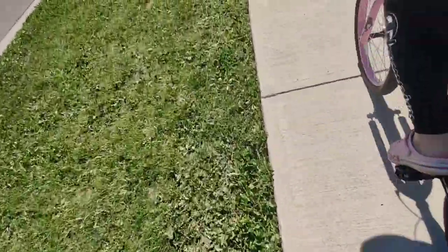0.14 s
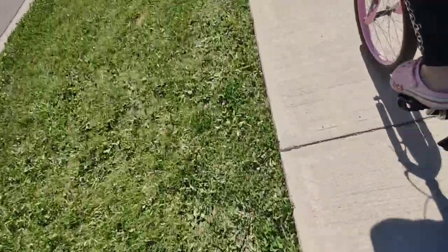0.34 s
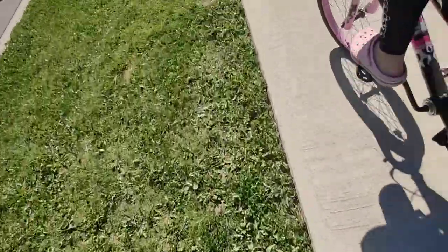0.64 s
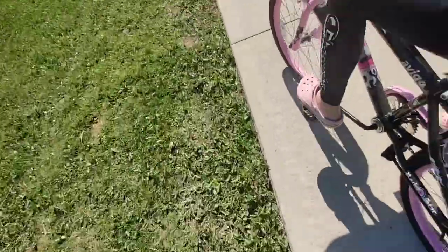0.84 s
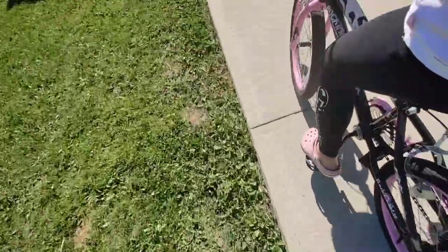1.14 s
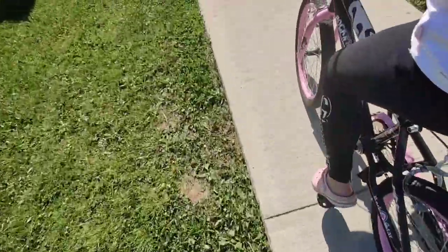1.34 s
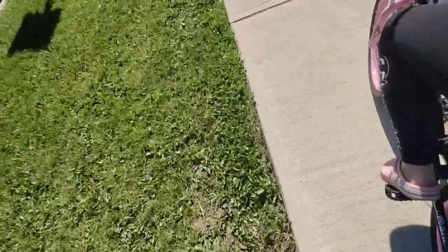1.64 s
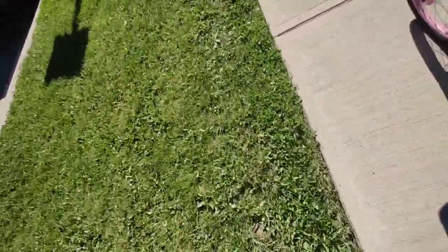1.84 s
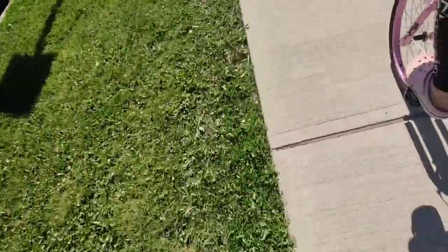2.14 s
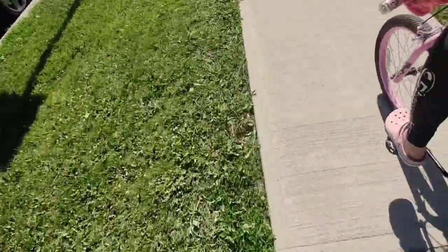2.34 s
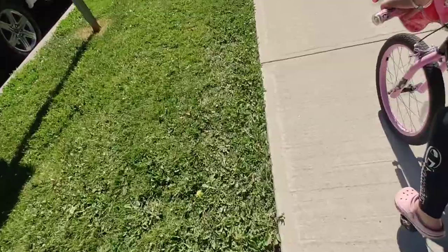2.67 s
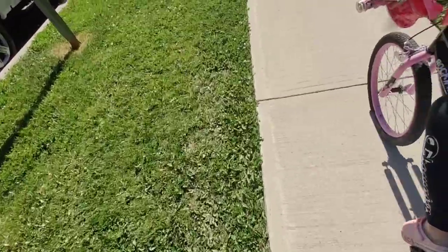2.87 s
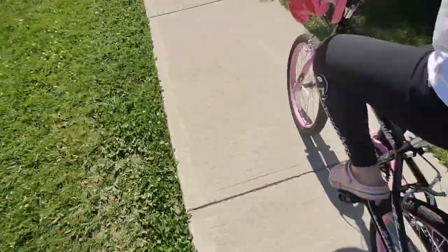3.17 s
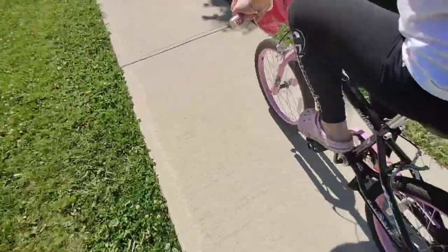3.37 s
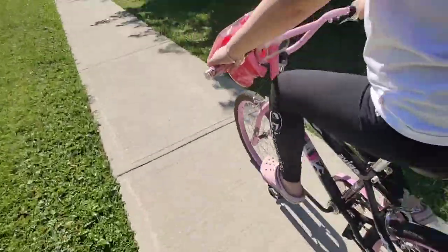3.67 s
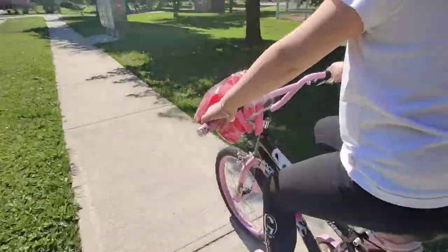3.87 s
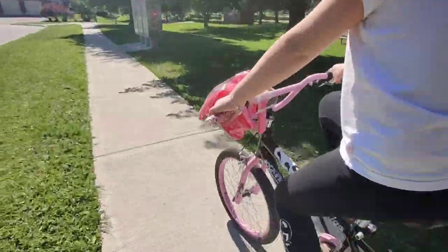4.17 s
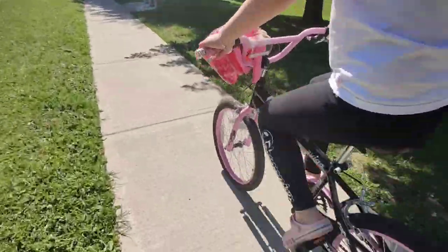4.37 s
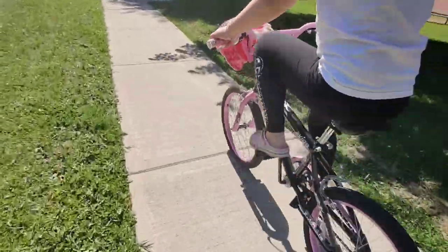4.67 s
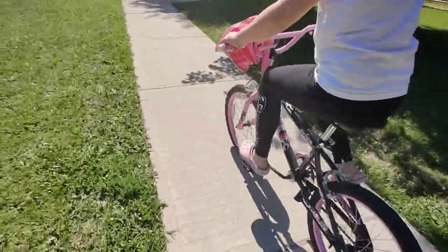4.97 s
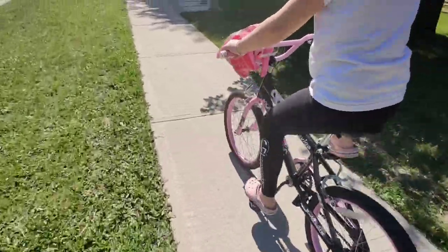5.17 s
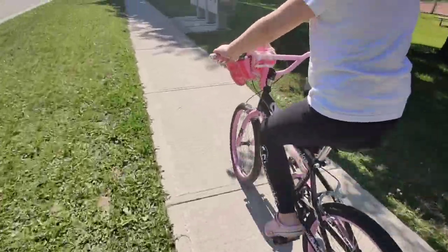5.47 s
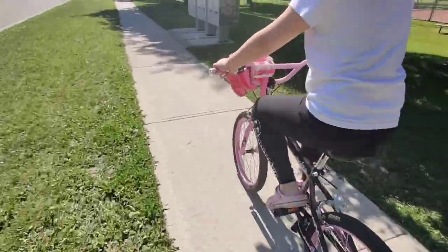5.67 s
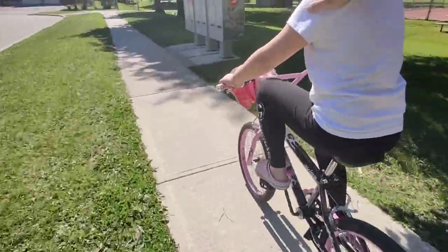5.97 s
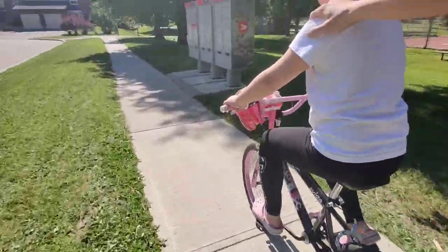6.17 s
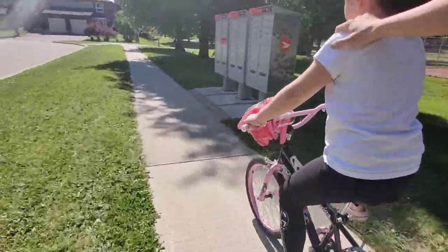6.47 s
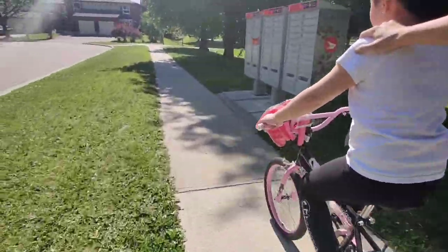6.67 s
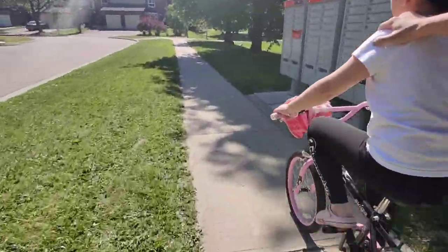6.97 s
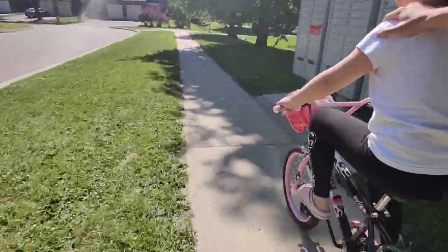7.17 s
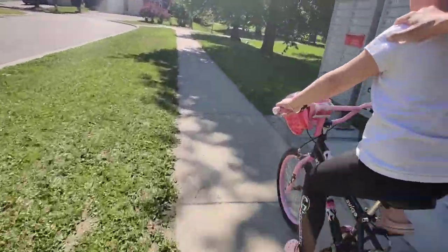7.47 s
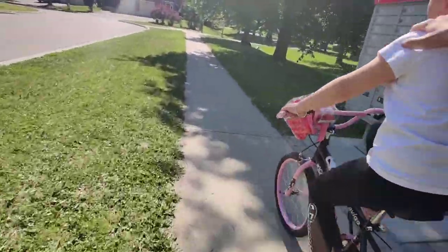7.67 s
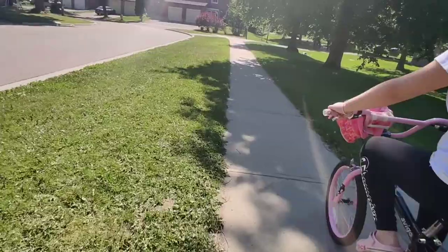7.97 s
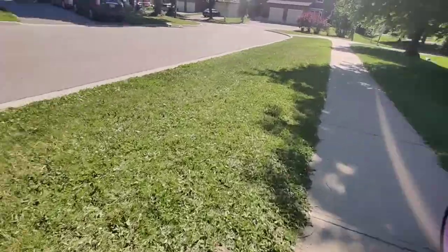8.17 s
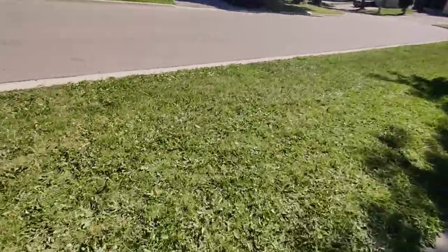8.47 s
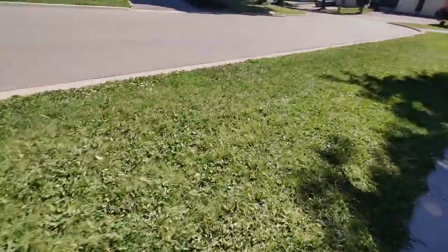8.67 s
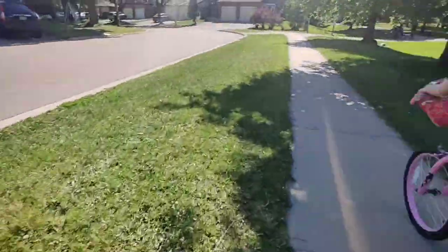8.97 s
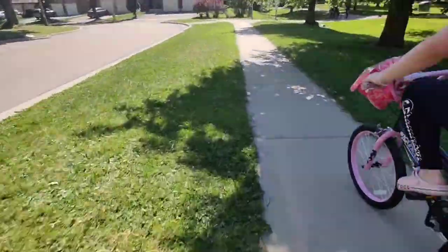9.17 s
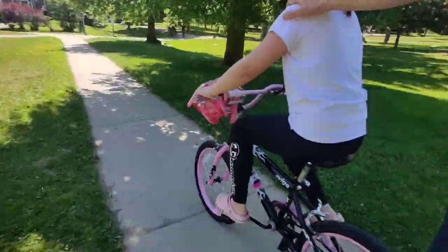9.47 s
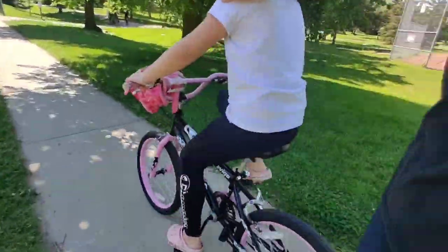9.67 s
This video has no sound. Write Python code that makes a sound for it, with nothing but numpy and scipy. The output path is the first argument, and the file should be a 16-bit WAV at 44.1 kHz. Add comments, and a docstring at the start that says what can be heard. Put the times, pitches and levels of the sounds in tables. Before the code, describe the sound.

A skateboard rolls on a rough concrete sidewalk in an open park, heard close from a moving handheld microphone. A low grainy rumble runs throughout, broken by irregular paired knocks and clacks as wheels cross joints, with gritty crunch and loose metal rattle. Lumpy wind booms and flutters unevenly left and right. The hardest clacks come just after the middle; a strong gust rises near the end. Almost no echo.

```python
"""Clacks ring out over a low rumble as a skateboard rolls on rough concrete, while wind buffets two microphone ports.
It runs beside a child's bicycle, heard from the rider's hand. Clacks layer a knock, ringing deck modes, a slap
and noise crunch; rolling is dense random impacts, filtered; grit ticks, sand, stones and scuffs are short noise.
Wind is lumpy filtered noise on each port. Clacks and sand leave only a short, faint tail.
Table levels are relative: trims in the functions set the final mix."""
import sys
import numpy as np
from scipy import signal
from scipy.fft import rfft, irfft
from scipy.io import wavfile
from scipy.ndimage import uniform_filter1d, minimum_filter1d, map_coordinates

SR = 44100
rng = np.random.default_rng(int(sys.argv[2]) if len(sys.argv) > 2 else 0)


def generate_wav(signal):
    """Clip the signal to [-1, 1] and save it as 16-bit WAV at the path in sys.argv[1]."""
    frames = np.transpose(np.atleast_2d(signal))
    scaled = np.clip(frames, -1, 1) * 32767
    pcm = np.round(scaled).astype(np.int16)
    wavfile.write(sys.argv[1], SR, pcm)


N = 433503
TIME = np.arange(N) / SR


def from_db(db):
    """Decibels to amplitude gain."""
    return np.exp(np.asarray(db) * (np.log(10) / 20))


def rms_one(x):
    """Scale to unit rms."""
    return x / np.sqrt(np.mean(x ** 2) + 1e-20)


def in_time(rows):
    """Draw the columns of an automation table sample by sample, with straight lines between points."""
    s, *columns = np.transpose(rows)
    return [np.interp(TIME, s, column) for column in columns]


def panned(x, balance_db):
    """Share a sound between left and right at constant power; positive balance leans left."""
    gains = from_db(np.array([[.5], [-.5]]) * balance_db)
    return x * gains / np.sqrt(np.mean(gains ** 2, axis=0))


def colour(x, spectrum, size=4096):
    """Causal minimum-phase filter: folding the cepstrum packs the energy at the onset."""
    hz, level_db = np.transpose(spectrum)
    bins = np.maximum(np.arange(size // 2 + 1) * SR / size, 1)
    gain = from_db(np.interp(np.log(bins), np.log(hz), level_db))
    cepstrum = irfft(np.log(gain))
    cepstrum[1:size // 2] *= 2
    cepstrum[size // 2 + 1:] = 0
    response = irfft(np.exp(rfft(cepstrum)))
    return signal.oaconvolve(x, response)[:len(x)]


def drift(rate_hz):
    """Slow random motion of rms 1: noise through two equal low-pass poles, run on every 40th sample."""
    r = np.exp(-2 * np.pi * rate_hz * 40 / SR)
    white = rng.standard_normal(N // 40 + 2002)
    slow = signal.lfilter([1], [1, -2 * r, r * r], white)[2000:]  # skip the settling
    return np.interp(np.arange(N) / 40, np.arange(len(slow)), rms_one(slow))


def noise(spectrum):
    """Coloured noise of rms 1."""
    return rms_one(colour(rng.standard_normal(N), spectrum))


def grains(per_s, spread_db):
    """Tiny impacts of uneven size at random moments."""
    out = np.zeros(N)
    born = np.flatnonzero(rng.random(N) < per_s / SR)
    spread = np.minimum(rng.standard_exponential(len(born)), 4)
    out[born] = from_db(spread_db * spread) * rng.standard_normal(len(born))
    return out


def impacts(per_s, spread_db, spectrum):
    """Coloured stream of tiny impacts, rms 1."""
    return rms_one(colour(grains(per_s, spread_db), spectrum))


def burst(t, t60, uneven_db=0):
    """A dying spray of micro-contacts with unit energy; when uneven, a few of them dominate."""
    size_db = uneven_db * rng.standard_normal(len(t)) - 60 * t / t60
    spray = rng.standard_normal(len(t)) * from_db(size_db)
    return spray / np.linalg.norm(spray)


def damped(t, hz, t60):
    """A struck mode: a sine with exponential decay."""
    return np.sin(2 * np.pi * hz * t) * from_db(-60 * t / t60)


def blow(x, level_db):
    """Set a short sound's energy to that of a hundredth of a second at the given rms level."""
    return from_db(level_db) * x * np.sqrt(SR / 100) / np.linalg.norm(x)


def add(out, s, x):
    """Mix x into out from time s, trimming whatever falls outside."""
    start = int(round(s * SR))
    skip = max(-start, 0)
    part = x[skip:N - start]
    out[start + skip:start + skip + len(part)] += part


# Place of the board between the ports: t/s, left lag/samples, left minus right/dB
PLACE = [(0, 8.2, -2.5), (2.7, 7.5, 0), (3.8, 7.2, -4), (4.4, 5.4, -3), (5.3, 6.1, -3.5), (6.7, 6.3, -4),
         (7.4, 5.1, -5), (8.1, 4.6, -1.5), (8.6, 5.7, -3.5), (8.8, 5.8, -4), (9.3, 6.9, -7), (9.83, 1, 0.5)]


def at_ports(x):
    """The board's sound reaches the right port first; moving lags and level differences place it."""
    lag, balance_db = in_time(PLACE)
    n = np.arange(N)
    left = map_coordinates(x, [n - lag / 2], order=3)
    right = map_coordinates(x, [n + lag / 2], order=3)
    return panned(np.array([left, right]), balance_db)


def scatter(x, wet_db=-17, near_t60=0.0053, near_db=-5.0, near_hz=1600):
    """Hand and casing scatter the treble, rider and bicycle throw back a short tail; each call draws new paths."""
    t = np.arange(len(x)) / SR
    treble = signal.butter(2, near_hz, "high", fs=SR, output="sos")
    near = from_db(near_db) * signal.sosfilt(treble, burst(t, near_t60))
    tail = from_db(wet_db) * burst(t, t60=.09)
    return signal.fftconvolve(x, near + tail)[:len(x)]


# Colour of the still air: f/Hz, level/dB
PARK = [(100, -9), (1000, 6), (2500, -14.5), (4000, -19), (5500, -13.5), (7500, -14.5), (13000, -25),
        (16000, -50)]


def still_park(level_db=-52):
    """Steady, quiet air noise, independent on each side."""
    return from_db(level_db) * np.array([noise(PARK), noise(PARK)])


def eddies(spectrum, shared, lump_db):
    """Lumpy turbulence at two ports, only partly alike; the lumps have a ceiling."""
    common = noise(spectrum)
    ports = []
    for _ in range(2):
        mixed = np.sqrt(shared) * common + np.sqrt(1 - shared) * noise(spectrum)
        lumps = from_db(lump_db * np.minimum(drift(42.7), 1.2))
        ports.append(mixed * lumps)
    return np.array(ports)


# Boom of the large eddies: f/Hz, level/dB
BOOM = [(12, -10), (25, -2), (60, -1.5), (110, -4.5), (160, -6), (250, -19.5), (500, -42.5), (3000, -89.5)]
# Flutter of the small eddies: f/Hz, level/dB
FLUTTER = [(60, -11), (130, 0), (200, 1.5), (290, -2.5), (420, -8.5), (560, -22.5), (900, -30.5),
           (1500, -42.5), (4000, -87)]
# Tearing colour of a gust at a port: f/Hz, level/dB
RASP = [(150, -22), (300, 2.5), (480, 2.5), (800, -8), (1300, -28.5), (2200, -37), (5000, -67)]
# Gusts on the left port: t/s, boom level/dB, flutter level/dB
WIND_LEFT = [(0.01, -23, -35), (0.28, -23.5, -45), (0.47, -32, -35), (0.67, -21, -36), (0.82, -24.5, -27),
             (0.94, -24.5, -35), (1.06, -19, -31), (1.17, -23.5, -36), (1.28, -11, -19),
             (1.49, -28.5, -40.5), (1.78, -22.5, -34), (2.15, -19.5, -39), (2.75, -37, -36),
             (2.88, -11, -37), (3.15, -41, -29.5), (3.27, -17, -21.5), (3.37, -30, -32.5),
             (3.71, -28, -29.5), (3.81, -44, -30), (4.0, -15, -27.5), (4.12, -28, -37), (4.5, -28, -44),
             (5.07, -21.5, -33), (5.17, -13.5, -24.5), (5.35, -7.5, -11), (5.5, -13.5, -22.5),
             (5.8, -11.5, -23), (5.99, -31, -30), (6.08, -24, -20), (6.21, -17.5, -31), (6.36, -25, -33),
             (6.71, -16.5, -21.5), (7.21, -16, -25.5), (7.37, -18.5, -27), (7.6, -18.5, -26.5),
             (7.86, -15.5, -16.5), (8.12, -23, -51), (8.45, -32, -33.5), (8.9, -14.5, -26.5),
             (9.08, -9, -17), (9.2, -10.5, -10), (9.33, -13, -16), (9.45, -18, -31.5), (9.77, -22, -42),
             (9.82, -15, -28)]
# Gusts on the right port: t/s, boom level/dB, flutter level/dB
WIND_RIGHT = [(0.01, -17, -18.5), (0.15, -19, -21.5), (0.28, -14, -18), (0.41, -8.5, -18.5),
              (0.48, -33, -43), (0.58, -23, -36), (0.65, -12, -21.5), (0.89, -34, -31), (1.02, -21.5, -24),
              (1.2, -21, -29.5), (1.36, -12.5, -20), (1.5, -25, -46), (1.69, -28, -43), (1.82, -25, -40),
              (1.97, -14, -32), (2.06, -14, -13), (2.19, -20, -22.5), (2.3, -16, -12), (2.42, -25.5, -21.5),
              (2.56, -16.5, -18), (2.73, -18, -19.5), (2.82, -19, -13), (3.0, -21, -20.5), (3.08, -11, -20),
              (3.3, -13.5, -22.5), (3.44, -13.5, -19), (3.55, -20, -20), (3.7, -19.5, -34),
              (3.78, -24, -34), (3.87, -20, -29), (3.95, -16, -22), (4.21, -23, -44), (4.33, -29, -47),
              (4.5, -18.5, -47), (4.62, -28.5, -43), (4.74, -26, -44), (4.83, -16, -17), (4.92, -13, -23),
              (5.08, -16, -15), (5.34, -13.5, -10.5), (5.6, -16, -17.5), (6.17, -23, -23),
              (6.3, -17.5, -14.5), (6.49, -25.5, -22), (6.68, -15.5, -18.5), (6.87, -21, -26),
              (7.08, -18.5, -23.5), (7.2, -19.5, -20), (7.42, -15, -18.5), (7.67, -19, -14.5),
              (7.76, -20, -30), (8.29, -31.5, -36.5), (8.53, -24.5, -38), (8.61, -24, -26),
              (8.71, -20.5, -24.5), (8.85, -25, -38), (9.0, -22, -25.5), (9.19, -6, -7),
              (9.3, -19.5, -24.5), (9.51, -23.5, -35), (9.82, -20, -19)]
BREEZE_DB = -16   # a middling flutter; above it the rasp gains on it


def wind(rasp_db=-16, rasp_growth=0.14, rasp_lump_db=6.5):
    """Large eddies boom on the ports and small ones flutter; the rasp grows faster than the flutter in a gust."""
    boom_db, flutter_db = np.stack([in_time(WIND_LEFT), in_time(WIND_RIGHT)], axis=1)
    boom_db = boom_db + np.array([[-3.0], [-0.44]])  # left, right trims
    flutter_db = flutter_db + np.array([[-1.5], [-1.0]])
    boom = eddies(BOOM, shared=0.12, lump_db=4.5)
    flutter = eddies(FLUTTER, shared=0.24, lump_db=5.0)
    gust_db = rasp_growth * (flutter_db - BREEZE_DB)
    rasp_level = from_db(rasp_db + gust_db + rasp_lump_db * drift(22.4))
    rasp = np.array([noise(RASP), noise(RASP)]) * rasp_level
    return boom * from_db(boom_db) + (flutter + rasp) * from_db(flutter_db)


# Level of a thin hiss on the right: t/s, level/dB
HISS = [(0, -75), (3.1, -86), (3.27, -56), (3.55, -57), (3.75, -53.5), (3.95, -78), (4.12, -68),
        (4.3, -87.5), (9.83, -78.5)]
# Colour of that hiss: f/Hz, level/dB
THIN_HISS = [(3000, -5.5), (6000, -5.5), (8000, -6.5), (11500, -6), (15000, -18)]
# Dry scuffs and rustles: start/s, end/s, level/dB, left minus right/dB
SCUFFS = [(0, 0.06, -49, -4), (0.468, 0.502, -51, -7), (0.649, 0.718, -37.5, -3.5), (0.731, 0.777, -46, 3),
          (3.097, 3.157, -48, -10), (3.757, 4.133, -49, -8), (5.356, 5.385, -37, 6), (5.608, 5.657, -52, 0),
          (8.098, 8.14, -45.5, -4), (8.583, 8.64, -43, 2)]
# Colour of a scuff: f/Hz, level/dB
SCUFF = [(600, -20), (1300, -1.5), (2500, -3.5), (4000, -7.5), (6000, -7.5), (9000, -13.5), (15000, -23.5)]


def scuffs(edge_share=0.36, hiss_pan_db=-7):
    """Brief gritty rubs made of dense micro-impacts that swell and fade, and a longer thin hiss."""
    rub = np.array([impacts(12000, 1.5, SCUFF) for side in range(2)])
    out = panned(noise(THIN_HISS) * from_db(in_time(HISS)[0]), hiss_pan_db)
    for start, end, level_db, balance_db in SCUFFS:
        ramp_s = edge_share * (end - start)
        inside_s = np.minimum(TIME - start, end - TIME)
        contact = np.clip(inside_s / ramp_s + .5, 0, 1)
        out = out + panned(rub * contact * from_db(level_db), balance_db)
    return out


# Grit and small rattles: t/s, level/dB, t60/s, brightness/dB per octave
TICKS = [(0.038, -40, .015, 4), (0.118, -31.5, 0.024, 0), (0.162, -42, .03, -9), (0.402, -40.5, 0.025, 5),
         (0.7526, -28, 0.016, -5), (1.263, -36, 0.021, -1), (1.286, -33.5, 0.027, -1),
         (2.169, -33.5, 0.018, -0.5), (2.332, -33.5, .024, 0), (2.675, -27.5, .014, -0.5),
         (2.83, -36, .018, 7), (3.231, -30, 0.0053, 1), (3.358, -36, 0.025, -2), (6.425, -42, .024, -4),
         (7.206, -28, 0.029, -7), (8.1723, -44, .012, 0), (8.305, -35, 0.03, -8), (9.204, -33.5, 0.02, 7),
         (9.258, -38.5, 0.029, 2), (9.27, -42, .024, 0), (9.391, -37, .018, -3), (9.499, -46.5, .01, 0)]
# Colour of a tick before its brightness tilt: f/Hz, level/dB
TICK = [(800, -21), (2000, 5), (4500, -5.5), (6200, -1.5), (8000, -8), (15000, -26)]


def ticks(gain_db=-8, left_lag_samples=7):
    """Bits of grit and loose parts snap off to the right: short noise sprays, late at the left port."""
    out, t = np.zeros(N), np.arange(SR // 16) / SR
    for s, level_db, t60, brightness_db in TICKS:
        spectrum = [(hz, db + brightness_db * np.log2(hz)) for hz, db in TICK]
        snap = colour(burst(t, t60, uneven_db=-5.0), spectrum)
        add(out, s, blow(snap, level_db + gain_db))
    return np.array([np.roll(out, left_lag_samples), out])


# Wheels swishing over rougher patches of concrete: t/s, level/dB
SWISH_LEVEL = [(0.01, -55), (0.16, -38.5), (0.27, -63), (0.6, -47.5), (0.96, -48), (1.1, -59), (1.26, -45),
               (1.42, -48), (1.62, -39.5), (1.8, -53), (1.92, -45), (1.98, -53), (2.08, -45.5),
               (2.2, -40.5), (2.27, -49), (2.35, -43), (2.5, -53), (2.94, -53), (3.83, -47.5),
               (4.25, -52.5), (4.45, -47.5), (4.92, -54.5), (5.37, -47), (5.46, -62), (5.64, -50),
               (5.99, -55), (6.3, -52), (6.46, -55), (6.96, -46), (8.19, -57.5), (8.4, -43), (8.59, -47),
               (8.85, -49), (9.02, -56), (9.13, -39.5), (9.3, -46), (9.46, -49), (9.82, -50.5)]
# Hard edge of a contact: f/Hz, level/dB
CRACK = [(250, -35.5), (600, -6.5), (1100, 3.5), (1600, 2.5), (2200, -1.5), (3000, 0.5), (4800, -13),
         (6500, -15), (9000, -28.5), (15000, -36.5)]


def sand(gain_db=-15):
    """Loose sand pops under the wheels as sparse impacts, most where the concrete is rough."""
    pops = impacts(150, 4.5, CRACK)
    heard = at_ports(pops) + np.array([scatter(pops), scatter(pops)])
    return heard * from_db(in_time(SWISH_LEVEL)[0] + gain_db)


# Grains of stone cracking under a striking wheel: t/s, ping f/Hz, level/dB
STONES = [(0.8363, 2200, -22.5), (0.8384, 2930, -22), (2.665, 5770, -57), (2.853, 2700, -23),
          (4.3953, 5900, -35), (4.414, 5870, -30), (8.121, 4400, -23)]


def stones(t60=0.012, crumble=0.73):
    """Each grain snaps and crumbles: a click and a noise spray excite one short ping."""
    out, t = np.zeros(N), np.arange(SR // 25) / SR
    for s, hz, level_db in STONES:
        contacts = signal.unit_impulse(len(t)) + crumble * burst(t, t60)
        add(out, s, blow(np.convolve(contacts, damped(t, hz, t60)), level_db))
    return at_ports(out)


# Colour of the loose trucks: f/Hz, level/dB
RATTLE = [(150, -8), (350, 7), (850, 5.5), (1300, -15.5), (2500, -13.5), (5000, -26), (10000, -36)]
RAGGED_T60_S = 0.049   # a joint that crunches this long shakes the trucks fully


def rattles(rattle_db=-3, stretch=3.5, delay_s=0.0037, own_db=-5):
    """The loose trucks clatter on after each strike, longer and louder on a ragged joint."""
    paths, t = np.zeros((3, N)), np.arange(SR // 8) / SR  # one shared, then one of each port's own
    for s, _, _, ring_db, _, _, crunch_t60 in STRIKES:
        shaken = min(crunch_t60 / RAGGED_T60_S, 1) ** 2
        for path in paths:
            clatter = colour(burst(t, stretch * crunch_t60, uneven_db=-0.5), RATTLE)
            add(path, s + delay_s, shaken * blow(clatter, ring_db + rattle_db))
    return at_ports(paths[0]) + from_db(own_db) * paths[1:]


# Dips in the slabs: t/s, level/dB
THUMPS = [(0.623, -30), (1.349, -24.5), (2.445, -29), (2.921, -17.5), (3.06, -26), (3.21, -21),
          (3.99, -27.5), (5.084, -14.5), (5.471, -18.5), (5.549, -14), (5.779, -21), (6.823, -22.5),
          (7.187, -17), (9.755, -21.5)]
# Dull bump of the board: f/Hz, level/dB
BUMP = [(90, -6), (220, 5.5), (450, -2), (850, -12), (1300, -25.5), (2500, -38), (6000, -80)]


def thumps(gain_db=-2.0):
    """A wheel sinks into a shallow dip: a slow push and the dull bump of the board, with no edge to slap."""
    push = np.hanning(SR // 250)
    out, bump = np.zeros(N), np.convolve(colour(signal.unit_impulse(SR // 20), BUMP), push)
    for s, level_db in THUMPS:
        add(out, s - len(push) / SR / 2, blow(bump, level_db + gain_db))  # push centred on s
    return at_ports(out)


# Hollow note of the urethane wheels: t/s, level/dB
HOLLOW = [(0, -62), (3.7, -61), (4.2, -46.5), (6, -43.5), (8.4, -47.5), (9.83, -41.5)]


def hollow_note(note_hz=882, t60=0.023, waver_db=2.0):
    """The grain of the concrete keeps one narrow resonance of the wheels ringing."""
    mode = damped(np.arange(SR // 8) / SR, note_hz, t60)
    note = signal.oaconvolve(colour(grains(2500, spread_db=-1.5), WHEEL), mode)[:N]
    return at_ports(rms_one(note) * from_db(in_time(HOLLOW)[0] + waver_db * drift(9.6)))


# Rolling level: t/s, wheel roar level/dB, grit level/dB
ROLL = [(0.0, -36, -50), (0.33, -43.5, -58.5), (1.18, -48, -58.5), (1.58, -37.5, -56.5), (1.94, -41, -54.5),
        (2.16, -36.5, -60.5), (2.41, -39, -57.5), (3.37, -40, -57.5), (3.91, -35, -59), (4.19, -39, -57),
        (4.71, -36.5, -56), (6.19, -36, -57.5), (6.71, -39.5, -53), (7.36, -35, -56.5), (8.6, -38, -53),
        (8.84, -42, -56), (9.14, -28, -52), (9.32, -35.5, -60), (9.48, -38.5, -57), (9.83, -38, -54.5)]
# Low rumble of the deck: f/Hz, level/dB
RUMBLE = [(50, -2.5), (120, -6.5), (230, 3.5), (330, -2.5), (390, -19.5), (435, 1.5), (520, -19.5),
          (720, -36), (1100, -33), (2000, -80)]
# Roar of the wheels: f/Hz, level/dB
WHEEL = [(400, -1.5), (560, -4), (700, 0.5), (810, -1.5), (900, -0.5), (990, -7.5), (1130, -13),
         (1290, -30), (1600, -12.5), (1900, -34), (2120, -23.5), (2400, -31.5), (4000, -54)]
# Crackle of the grit: f/Hz, level/dB
GRIT = [(700, -7.5), (1400, -4), (2200, -2.5), (3200, -2.5), (4200, -7), (6000, -3.5), (8000, -21),
        (13000, -17.5), (16000, -33)]
# Swish over rough concrete: f/Hz, level/dB
SWISH = [(700, -7), (1150, 7.5), (1550, -1), (2100, -4), (3000, -20), (4500, -38), (8000, -32)]


def rolling(rumble_gain_db=3, wheel_gain_db=-3.0, grit_gain_db=-2, swish_gain_db=-3, patch_db=1.64, pit_gain_db=2):
    """Concrete grain shakes deck and wheels, pits bump, rough patches swish; grit crackles apart at each port."""
    wheel_db, grit_db = in_time(ROLL)
    rumble = impacts(3000, -0.5, RUMBLE) * from_db(rumble_gain_db)
    wheel = impacts(6000, 3.0, WHEEL) * from_db(wheel_gain_db)
    pits = impacts(45, 0, BUMP) * from_db(pit_gain_db)
    swish = impacts(9000, 0.5, SWISH) * from_db(in_time(SWISH_LEVEL)[0] + swish_gain_db)
    grit = np.array([impacts(5500, 1.0, GRIT) for side in range(2)])
    board = at_ports((rumble + wheel + pits) * from_db(wheel_db) + swish)
    patches = from_db(patch_db * drift(17.0))
    return (board + grit * from_db(grit_db + grit_gain_db)) * patches


# Modes of deck and trucks: f/Hz, level/dB, t60/s
DECK = [(257, -6.5, 0.056), (622, -8.5, 0.046), (808, 8.5, 0.022), (956, -7, 0.015), (1644, -14, 0.012),
        (2090, -25.5, 0.022), (2840, -24.5, 0.019)]


def knock(t, thump_db, hz, ring_db, thump_cycles=9, rise_s=0.00061, detune=0.027,
          body_hz=290, body_t60=0.038, body_db=-6):
    """The wheel's dead thump and the ring of the deck, whose modes shift with the rider's weight."""
    squeeze = 1 - np.exp(-t / rise_s)   # the urethane gives a little
    load = 1 + detune * rng.standard_normal()
    ring = np.zeros(len(t))
    for mode_hz, db, t60 in DECK:
        ring += from_db(db + rng.normal(0, 2.4)) * damped(t, mode_hz * load, t60)
    thump = damped(t, hz, thump_cycles / hz)
    body = blow(damped(t, body_hz, body_t60), thump_db + body_db)   # the whole loaded board jolts
    return body + blow(thump * squeeze, thump_db) + blow(ring * squeeze, ring_db)


def edge(brightness_db):
    """Spectrum of a contact: a sharper edge tilts it towards the treble."""
    return [(hz, db + brightness_db * np.log2(np.clip(hz, 1200, 6500) / 2000)) for hz, db in CRACK]


# Wheels striking joints: t/s, thump level/dB, thump f/Hz, deck ring level/dB, slap level/dB,
# brightness/dB per octave, crunch t60/s
STRIKES = [(0.003, -18.5, 397, -23, -32.5, 2.5, 0.033), (0.166, -35, 494, -28, -39, -10, 0.044),
           (0.285, -25, 346, -38, -50, -3, .03), (0.8155, -19.5, 394, -26, -48, 13, 0.042),
           (0.837, -18, 383, -14.5, -24.5, -1.5, 0.024), (1.011, -39, 496, -35, -46, 2, 0.022),
           (1.036, -23, 414, -32, -45, 8, 0.043), (1.279, -31.5, 537, -50, -44, 2, 0.043),
           (1.693, -33, 500, -24.5, -40, -4, 0.082), (1.729, -31, 493, -25, -49, -2, 0.022),
           (2.04, -22, 360, -40, -50, 0, .04), (2.089, -23.5, 427, -37, -50, -2, 0.041),
           (2.306, -34, 397, -36, -51, -14, 0.044), (2.347, -28, 500, -31, -51, -8, 0.031),
           (2.661, -28, 370, -27.5, -34, -1, 0.035), (2.667, -17, 460, -22, -35, 6.5, 0.046),
           (2.849, -15.5, 376, -23.5, -22.5, -4, 0.036), (3.607, -19, 370, -29.5, -36, -4, 0.064),
           (3.625, -20.5, 358, -29, -37.5, 2, 0.044), (3.772, -17, 344, -21.5, -34, -7, 0.073),
           (3.786, -19, 447, -22.5, -29, -11, 0.072), (3.919, -28, 424, -32, -35.5, -7, 0.15),
           (4.396, -36, 680, -30, -28.5, 7, 0.039), (4.4152, -20.5, 435, -19, -24.5, -2, 0.04),
           (4.55, -22, 437, -31, -31.5, -4, 0.055), (4.567, -19.5, 410, -27, -28, -19, 0.045),
           (4.841, -25, 447, -44, -48, -7, 0.03), (5.168, -27, 480, -36, -43, -13, 0.035),
           (5.187, -26, 560, -38, -45, -10, 0.02), (5.2219, -9.5, 720, -10.5, -9, -3, 0.024),
           (5.341, -14.5, 337, -25, -45, -7, 0.064), (5.3692, -9, 390, -18, -16, -9, 0.043),
           (5.379, -8, 400, -22, -34, 6, 0.04), (5.433, -15, 437, -36, -42, -10, 0.025),
           (5.9286, -13, 720, -18, -17, -3, 0.026), (6.053, -22, 430, -38, -38, -5, 0.045),
           (6.069, -16, 415, -28, -32.5, -1.5, 0.057), (6.268, -20, 437, -42, -45, -11, 0.027),
           (6.29, -26, 330, -30.5, -47, -8, 0.04), (6.307, -31, 360, -36, -44, -9, .03),
           (6.554, -30, 560, -28, -37.5, -2, 0.044), (6.5734, -22, 620, -15, -21.5, -2.5, 0.036),
           (6.59, -23, 560, -22, -36, -11, 0.043), (6.698, -23, 400, -31, -36, -4, 0.033),
           (6.7129, -16.5, 430, -21, -30, -4.5, 0.042), (7.317, -13, 660, -12, -10.5, -1, 0.04),
           (7.455, -12, 426, -27, -22, -9.5, 0.035), (7.464, -19.5, 410, -40, -37, 9, 0.018),
           (7.9872, -19.5, 630, -13.5, -18, -3, 0.029), (8.117, -14, 433, -13, -16.5, -4, 0.033),
           (8.601, -26.5, 490, -20.5, -26, -5, 0.038), (8.619, -37, 497, -25, -32, -8, 0.048),
           (8.637, -45, 495, -31, -33, -1, 0.031), (8.74, -23, 403, -28.5, -30.5, -4, 0.06),
           (8.76, -20.5, 393, -33, -33.5, -6, 0.091), (9.251, -21, 440, -23, -38, -7, 0.03),
           (9.271, -30, 447, -23, -42, -1, 0.019), (9.318, -22, 422, -31, -43, -11, .04),
           (9.392, -21.5, 432, -28, -38, 3.5, 0.041), (9.4078, -26, 430, -29, -25.5, -6.5, 0.026),
           (9.425, -24, 434, -32, -43, -3, 0.028)]
HARD_CRACK_DB = -4.5   # a square hit on the edge; weaker ones are more scrape than slap


def clacks(crunch_db=-8, crunch_growth=0.65, lead_db=-20, lead_growth=0.36, lead_t60=0.027,
           drop_s=0.003376, drop_db=-10):
    """Wheels scrape into the joint, drop with a soft bump, then meet the far edge: slap, knock and crunch."""
    out, t = np.zeros(N), np.arange(SR // 10) / SR
    scattered = np.zeros((2, N))
    for s, thump_db, hz, ring_db, slap_db, brightness_db, crunch_t60 in STRIKES:
        spectrum = edge(brightness_db)
        glancing_db = HARD_CRACK_DB - slap_db
        crunch = from_db(crunch_db + crunch_growth * glancing_db) * burst(t, crunch_t60, uneven_db=6.5)
        slap = blow(colour(signal.unit_impulse(len(t)) + crunch, spectrum), slap_db)
        hit = slap + knock(t, thump_db, hz, ring_db)
        add(out, s, hit)
        for port in scattered:
            add(port, s, scatter(hit))
        drop = knock(t, thump_db, hz, ring_db + drop_db) * from_db(drop_db)
        add(out, s - drop_s, drop)
        scrape = colour(burst(t, lead_t60)[::-1], spectrum)  # reversed, so it swells into the hit
        add(out, s - t[-1], blow(scrape, slap_db + lead_db + lead_growth * glancing_db))
    return at_ports(out) + scattered


def scene():
    """Still park, wind and rubbing around the rolling board."""
    surroundings = still_park() + wind() + scuffs()
    debris = ticks() + sand() + stones()
    board = rattles() + thumps() + hollow_note() + rolling() + clacks()
    return surroundings + debris + board


def ducking(over_db, hold_s, release_db_per_s, size=65):
    """Gain that drops on an overload, holds and recovers at a steady dB rate, with softened corners."""
    half = int(hold_s * SR / 2)
    over_db = -minimum_filter1d(-over_db, 2 * half + 1, origin=half, mode="nearest")
    fall_db = release_db_per_s * TIME
    held_db = np.maximum.accumulate(over_db + fall_db) - fall_db
    return uniform_filter1d(minimum_filter1d(from_db(-held_db), size), size)


def limiter(x, split_hz=1400, ceiling=.91):
    """Peaks over the ceiling pull both bands down; the treble returns sooner than the rumble."""
    over_db = np.maximum(20 * np.log10(np.abs(x).max(axis=0) / ceiling + 1e-9), 0)
    low = signal.sosfiltfilt(signal.butter(2, split_hz, fs=SR, output="sos"), x)
    low_gain = ducking(over_db, hold_s=0.069, release_db_per_s=120)
    treble_gain = ducking(over_db, hold_s=0.012, release_db_per_s=218)
    return low * low_gain + (x - low) * treble_gain


# Extra response of the left port: f/Hz, level/dB
LEFT_PORT = [(100, 1.5), (4500, 5), (7000, -9), (15000, 1)]
CUTOFF_HZ = 15900


def record(dry, port_hz=4850, port_width_hz=300, port_gain=1.07):
    """The ports resonate in the treble; a limiter holds the peaks and the top is cut."""
    b, a = signal.iirpeak(port_hz, port_hz / port_width_hz, fs=SR)
    left, right = dry + port_gain * signal.lfilter(b, a, dry)
    heard = limiter(np.array([colour(left, LEFT_PORT), right]))
    top_cut = signal.ellip(10, .1, 80, CUTOFF_HZ, fs=SR, output="sos")
    return signal.sosfilt(top_cut, heard)


dry = scene()
out = record(dry)
generate_wav(out)
```